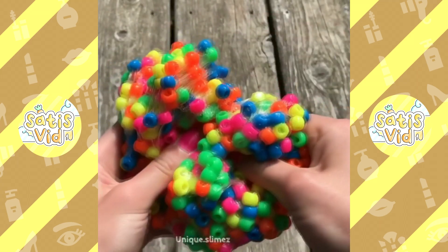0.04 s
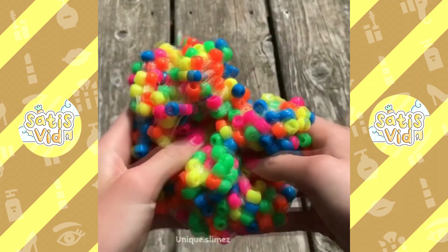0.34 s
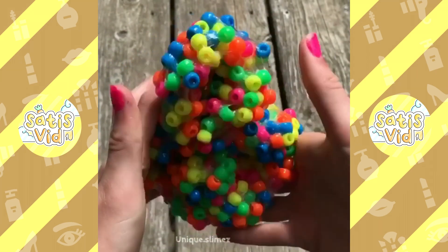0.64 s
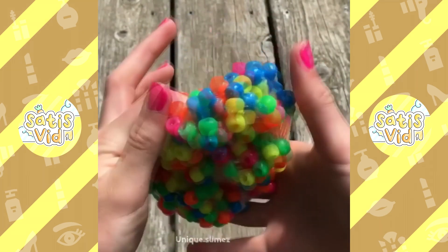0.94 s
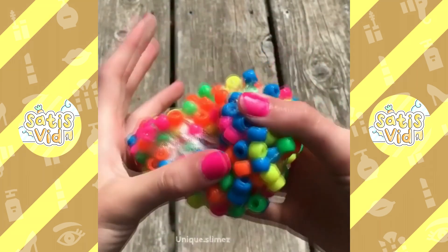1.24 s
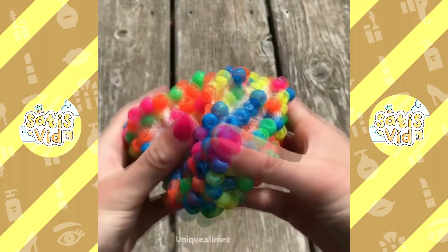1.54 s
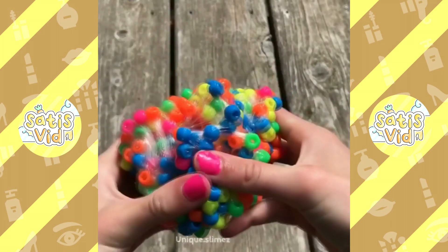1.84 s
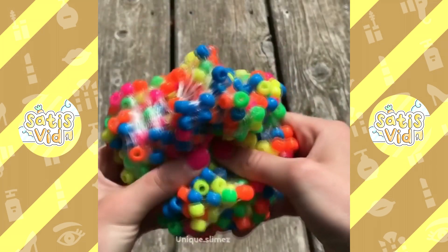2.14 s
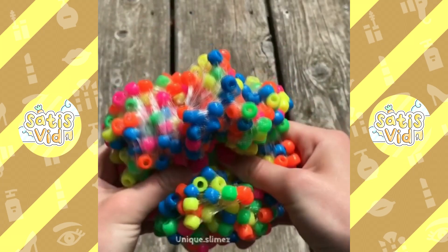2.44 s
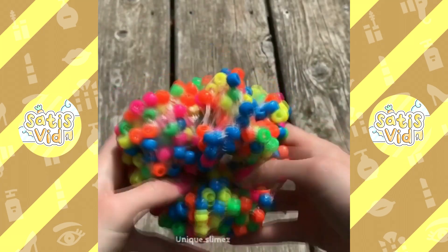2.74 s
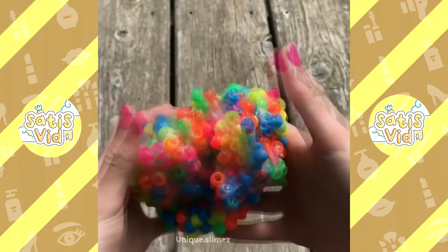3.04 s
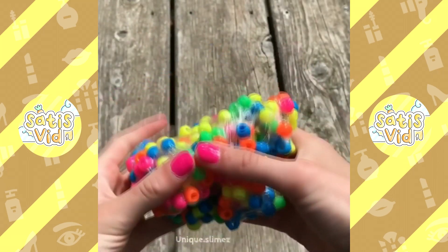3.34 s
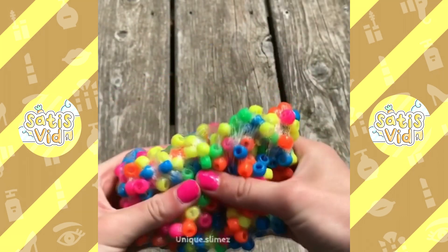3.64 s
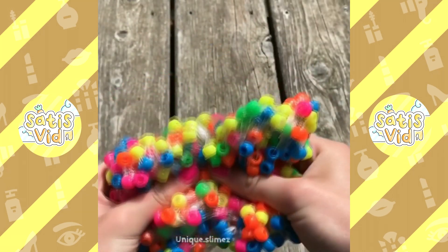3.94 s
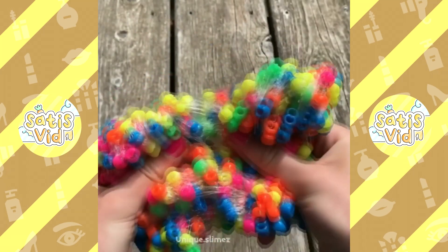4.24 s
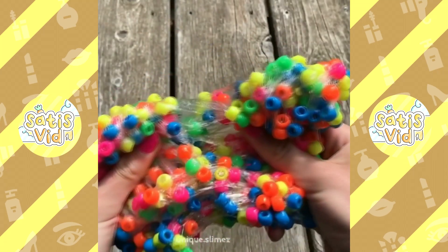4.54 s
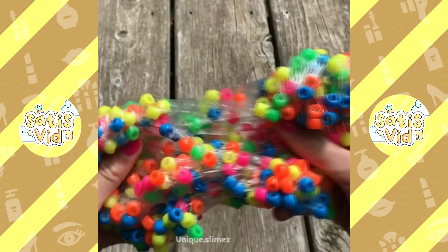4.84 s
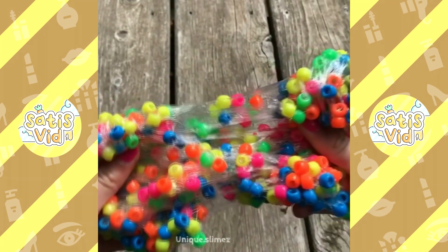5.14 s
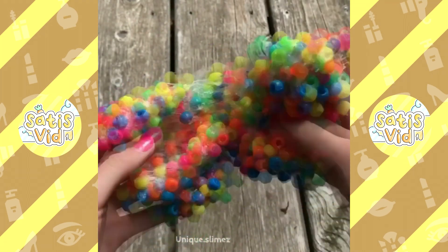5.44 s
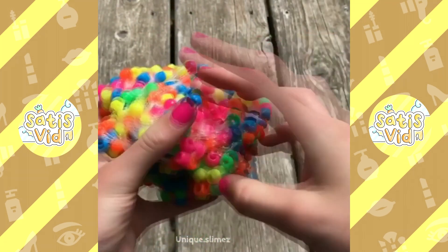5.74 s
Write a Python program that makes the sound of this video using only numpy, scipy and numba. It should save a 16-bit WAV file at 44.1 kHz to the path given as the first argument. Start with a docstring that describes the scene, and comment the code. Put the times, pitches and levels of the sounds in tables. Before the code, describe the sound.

Slime packed with plastic beads crackles, pops and squishes in uneven bursts as it is kneaded and pulled, with a faint room hum behind.

```python
"""In a room with a low hum, two hands close by knead and stretch slime full of plastic beads.
The lump bumps against the palms; folds collapse in wet squishes and squelch as air is pressed through.
Countless tiny bursts crackle with each squeeze and through one long pull.
Trapped air pops and beads snap free in sharp clicks, scattered by beads and fingers."""
import sys
import numpy as np
from scipy import signal
from scipy.fft import rfft, irfft
from scipy.io import wavfile
from numba import njit

SR = 44100
rng = np.random.default_rng(int(sys.argv[2]) if len(sys.argv) > 2 else 0)


def persist_wave(psi):
    """Save psi, clipped to +-1, as 16-bit WAV."""
    counts = np.round(np.clip(psi, -1, 1) * 32767).astype(np.int16)
    wavfile.write(sys.argv[1], SR, np.atleast_2d(counts).T)


N = 259749


def undb(db):
    """Decibels to gain."""
    return 10 ** (np.asarray(db) / 20)


def unit(x):
    """Scale to unit energy."""
    return x / np.sqrt(np.sum(x ** 2) + 1e-18)


def level(x, rms_db):
    """Scale to an rms level."""
    return unit(x) * np.sqrt(len(x)) * undb(rms_db)


def butter(x, hz, kind, order):
    """Low-pass or high-pass filter."""
    return signal.sosfilt(signal.butter(order, min(hz, .45 * SR), kind, fs=SR, output="sos"), x)


def add(track, time_s, sound):
    """Mix a sound into a track."""
    start = int(np.clip(time_s * SR, 0, N - 1))
    track[start:start + len(sound)] += sound[:N - start]


def tail(t60_s, gap_s):
    """Dense random reflections, decaying after a gap."""
    t = np.arange(SR // 4) / SR
    return unit(rng.standard_normal(len(t)) * np.exp(-np.log(1000) * t / t60_s) * (t > gap_s))


def bubble(hz, cycles, rise):
    """Air pocket: rings down 60 dB, pitch rising as it closes."""
    age = np.arange(int(cycles * SR / hz)) * hz / (cycles * SR)
    tone = np.sin(2 * np.pi * cycles * age * (1 + rise * age / 2))
    envelope = np.exp(-np.log(1000) * age) * (1 - np.exp(-age * cycles))
    return unit(tone * envelope)


@njit
def rings(start, hz, width_hz, size):
    """Bursts: each swells quickly and rings out at its own pitch."""
    track = np.zeros(N)
    for k in range(len(start)):
        decay = np.pi * width_hz[k] / SR
        pole = np.exp(-decay + 2j * np.pi * hz[k] / SR)
        phasor = 2 * np.sqrt(2) * decay ** 1.5 * size[k] + 0j  # unit energy at size 1
        for i in range(min(int(9 / decay), N - start[k])):
            track[start[k] + i] += i * phasor.imag
            phasor *= pole
    return track


# Room noise spectrum: (frequency [Hz], relative density [dB])
ROOM_SPECTRUM = [(20, -24), (35, -22), (50, -4.5), (68, 2), (98, -5), (122, -4), (155, -13), (320, -17.5),
                 (550, -25), (1200, -27), (2500, -30.5), (7000, -32.5), (13500, -45.5)]
def room_tone(rms_db=-52):
    """Steady low hum of air, faint hiss above."""
    hz, db = np.transpose(ROOM_SPECTRUM)
    bin_hz = np.arange(N // 2 + 1) * SR / N
    gain = undb(np.interp(np.log(bin_hz + 1), np.log(hz), db))
    return level(irfft(rfft(rng.standard_normal(N)) * gain, N), rms_db)


# Lump shifting against the palms: (time [s], energy [dB], pitch [Hz])
PALM_BUMPS = [(0.385, -19, 81), (0.539, -22, 158), (0.6, -20, 96.2), (1.095, -20, 70.4), (1.495, -21, 88),
              (1.605, -22, 80), (3.595, -19.5, 69.7), (4.355, -17, 68.1), (5.101, -25, 185)]
def bumps():
    """The soft mass swings a few times and stops."""
    track = np.zeros(N)
    for time_s, db, hz in PALM_BUMPS:
        add(track, time_s, undb(db) * bubble(hz, cycles=9, rise=0.045))
    return track


# Collapsing folds: (centre [s], energy [dB], half length [s], lowest pitch [Hz], highest pitch [Hz])
FOLD_SQUISHES = [(0.239, -24, 0.023, 400, 1200), (0.482, -23, 0.018, 280, 1698), (1.05, -25, .2, 220, 900),
                 (1.451, -25, .3, 219, 903), (2.28, -23, 0.031, 210.4, 996.7),
                 (2.5, -26, 0.014, 348.4, 1300), (4.14, -16.5, .05, 380.2, 2400)]
def squishes(count=160, width_ratio=0.74):
    """A fold bursts a cloud of large, heavily damped pockets; no clear pitch."""
    track = np.zeros(N)
    for centre_s, db, half_s, low_hz, high_hz in FOLD_SQUISHES:
        early, late, pitch, size = rng.random((count, 4)).T
        start = ((centre_s + half_s * (late - early)) * SR).astype(int)
        hz = low_hz * (high_hz / low_hz) ** pitch
        track += undb(db) * unit(rings(start, hz, hz * width_ratio, 2 * size - 1))
    return track


# Air escapes: (start [s], energy [dB], pitch [Hz], length [s])
AIR_SQUELCHES = [(0.066, -19, 1800, .012), (0.1987, -17.5, 1490, 0.0061), (0.225, -24.5, 910, 0.007),
                 (0.242, -26, 830, .012), (0.298, -29, 480, .012), (0.457, -28, 1640, 0.0061),
                 (0.252, -29, 1560, 0.023), (1.169, -26, 1380, .014), (1.245, -25, 1155, 0.036),
                 (1.256, -23.5, 1590, 0.038), (2.149, -12.5, 1720, 0.0029), (2.277, -13, 1710, 0.0057),
                 (2.501, -21, 1933, 0.0031), (3.307, -28, 2645, 0.0044), (3.724, -19.5, 1266, 0.048),
                 (3.74, -16.5, 1900, 0.00601), (3.893, -11, 1920, 0.0044), (3.924, -15, 1480, 0.0055),
                 (4.075, -22, 1804, 0.0031), (4.153, -22, 2096, .02), (4.215, -20, 1439, 0.0035),
                 (4.364, -25, 1760, .012), (5.069, -25, 403.5, 0.044), (5.202, -24.5, 353.6, 0.076),
                 (5.515, -23.5, 2630, 0.036), (5.696, -22, 2306, .003)]
def squelches(bubbles_per_s=300, detune=0.11):
    """Air squeezed through wet folds: quick strings of bubbles, each around one pitch."""
    track = np.zeros(N)
    for start_s, db, hz, length_s in AIR_SQUELCHES:
        count = 1 + int(length_s * bubbles_per_s)
        for k, (late, offset) in enumerate(rng.uniform(-1.02, 1, (64, 2))[:count]):
            sound = bubble(hz * (1 + detune * offset), cycles=8.2, rise=0.067)
            add(track, start_s + length_s * (k + late / 2) / count, undb(db) / np.sqrt(count) * sound)
    return track


# Bead and palm resonances: (centre [Hz], width [Hz], gain [dB])
HOLLOW_MODES = [(1615, 140, -11), (1880, 53, -21), (5600, 450, -44), (9360, 510, -10.5)]
def hollow(x):
    """Beads and cupped palms colour the bursts."""
    return x + sum(undb(db) * signal.lfilter(*signal.iirpeak(hz, hz / width_hz, fs=SR), x)
                   for hz, width_hz, db in HOLLOW_MODES)


def grip(t, full_s, hold_s, close_db_per_s=280, release_db_per_s=270):
    """Gain of one grip: fingers close, hold, let go."""
    closing_db = close_db_per_s * np.maximum(full_s - t, 0)
    release_db = release_db_per_s * np.maximum(t - full_s - hold_s, 0)
    return undb(-closing_db - release_db)


# Turning the lump over: (start [s], length [s], level [dB], tilt [dB/octave])
LIGHT_TURNS = [(0.0, 1.77, -58, 0.9), (1.848, 0.86, -61, 0.5), (2.847, .25, -68, 3.5),
               (5.249, 0.74, -63, 0.2)]
def handling(t, density=3):
    """A light touch frees more, smaller bursts. Returns (gain, tilt, density) per turn."""
    return [(undb(db) * grip(t, start_s, length_s), tilt, density)
            for start_s, length_s, db, tilt in LIGHT_TURNS]


# Hand squeezes: (full grip [s], hold [s], level [dB], tilt [dB/octave])
HAND_SQUEEZES = [(0.0, 0.072, -39.5, 0), (0.113, 0.062, -53, 0.5), (0.208, 0.11, -49.5, -2.5),
                 (0.474, 0.009, -46, 1), (0.536, 0.055, -57.5, -2), (0.888, 0.016, -55, 0.5),
                 (1.053, 0.021, -56, 1.5), (1.186, 0.13, -54, 1), (1.762, 0.068, -49.5, 0),
                 (1.959, 0.077, -53, -1), (2.045, .03, -48.5, -4.5), (2.1, 0.22, -41.5, -2.5),
                 (2.119, 0.016, -38.5, 5), (2.274, 0.013, -39.5, 3.5), (2.485, 0.05, -50, -1.5),
                 (2.663, 0.0088, -53, 0.5), (2.829, 0.0131, -48, -2), (3.314, 0.01, -54, 0),
                 (3.477, 0.0097, -55, -2), (4.374, 0.0096, -46.5, -3), (4.558, 0.046, -50.5, 0.5),
                 (5.112, 0.1, -53.5, -3.5), (5.485, 0.082, -47.5, 1.1), (5.581, .09, -56.5, 1.5),
                 (5.683, 0.021, -44.5, 1.5), (5.808, 0.019, -52.5, 3.5)]
def squeezes(t, density=1.5, sag_db_per_s=6):
    """A closing fist bursts many small pockets at once; the crackle tires under a held grip."""
    moves = []
    for full_s, hold_s, db, tilt in HAND_SQUEEZES:
        sag_db = sag_db_per_s * np.clip(t - full_s, 0, hold_s)
        moves.append((undb(db - sag_db) * grip(t, full_s, hold_s), tilt, density))
    return moves


# Crackle envelope of the long pull: (time [s], level [dB])
PULL_ENVELOPE = [(3.53, -71.5), (3.6, -49.5), (3.69, -41), (3.95, -38.5), (4.02, -44.5), (4.17, -44.5),
                 (4.42, -52), (4.62, -54), (4.92, -52.5), (5.02, -64)]
def pull(t, brightening_db_per_octave_s=0.55, doubling_s=.7):
    """Slime drawn into threads: as they thin, the bursts get finer and brighter."""
    gain = undb(np.interp(t, *np.transpose(PULL_ENVELOPE), left=-np.inf, right=-np.inf))
    pulled_s = t - PULL_ENVELOPE[0][0]
    tilt = -0.66 + brightening_db_per_octave_s * pulled_s
    density = .95 * 2 ** (pulled_s / doubling_s)
    return [(gain, tilt, density)]


def clumps_db(t, spread_db=1.23, clump_s=.006):
    """Stick-slip: the level wanders from clump to clump."""
    return spread_db * np.interp(t / clump_s, np.arange(N // 20), rng.standard_normal(N // 20))


def kneading():
    """Crackle level [dB], tilt [dB/octave] and density factor of all hand moves, weighted by power."""
    t = np.arange(N) / SR
    moves = squeezes(t) + handling(t) + pull(t)
    power = sum(gain ** 2 for gain, _, _ in moves)
    mean_tilt = sum(gain ** 2 * tilt for gain, tilt, _ in moves) / power
    mean_density = sum(gain ** 2 * density for gain, _, density in moves) / power
    return 10 * np.log10(power * flare(t)) + clumps_db(t), mean_tilt, mean_density


# Burst strength, large air pockets to fine threads: (pitch [Hz], relative level [dB])
BURST_SPECTRUM = [(230, -16), (620, -22.5), (900, -8), (1250, -5.5), (1900, -5), (3000, -0.5), (4300, -4),
                  (6400, 0.5), (9500, -4.5), (13500, -6)]
def crackle(base_rate_per_s=3500, spread_db=4.0, scatter_db=-4, width_ratio=0.53, parts=8):
    """Tiny random bursts of every pitch; a harder squeeze makes them denser and louder."""
    knead_db, tilt, density = kneading()
    chance = base_rate_per_s * density * undb(.5 * (knead_db + 43.5)) / SR
    start = np.flatnonzero(rng.random(N) < chance)
    pitch, strength, damping, sign = rng.random((N, 4))[start].T
    pitch_hz, pitch_db = np.transpose(BURST_SPECTRUM)
    # small pockets outnumber large ones
    hz = (np.sqrt(pitch_hz[0]) * (1 - pitch) + np.sqrt(pitch_hz[-1]) * pitch) ** 2
    width_hz = hz * width_ratio * 2 ** (2 * damping - 1)
    colour_db = np.interp(np.log(hz), np.log(pitch_hz), pitch_db)
    colour_db += tilt[start] * np.log2(np.maximum(hz, 1000) / 5000)
    # mostly weak bursts; the thin films of small pockets snap hardest
    limit_db = 15 + np.log2(np.minimum(hz, 5000) / 5000)
    strength_db = np.minimum(-spread_db * np.log(1 - strength), limit_db)
    size = level(undb(strength_db), 2.0) * np.sign(sign - .5)
    size *= undb(colour_db + knead_db[start]) / np.sqrt(chance[start])
    track = np.zeros(N)
    for part in range(parts):  # each part of the lump scatters in its own way
        here = np.arange(len(start)) % parts == part
        direct = rings(start[here], hz[here], width_hz[here], size[here])
        scattered = signal.oaconvolve(direct, tail(t60_s=0.017, gap_s=.0005))[:N]
        track += direct + undb(scatter_db) * scattered
    return track


def pop(hz, width_hz, cutoff_ratio, highpass_hz, swell_s):
    """A tiny cavity rings briefly; soft slime rounds off the treble."""
    t = np.arange(SR // 100) / SR
    envelope = (1 - np.exp(-t / swell_s)) * np.exp(-np.pi * width_hz * t)
    softened = butter(envelope * np.sin(2 * np.pi * hz * t), hz * cutoff_ratio, "low", order=4)
    return unit(butter(softened, highpass_hz, "high", order=4))


# Air pops and bead clicks: (time [s], relative energy [dB], centre [Hz], width [Hz])
LOUD_POPS = [(0.0188, -3.5, 9800, 1910), (0.033, -6.5, 8000, 1600), (0.04, 1, 7300, 1300),
             (0.047, -3.5, 5600, 3420), (0.0556, -9.5, 6100, 4000), (0.126, -21, 5900, 3800),
             (0.1941, -23.5, 3200, 2500), (0.199, -18, 4600, 3000), (0.2037, -12.5, 4900, 4200),
             (0.223, -22.5, 6000, 4600), (0.279, -21, 1900, 1500), (0.4799, -23, 3000, 3000),
             (0.741, -23.5, 6260, 3210), (0.8832, -19.5, 6130, 2600), (0.909, -30, 6180, 3060),
             (1.0449, -14.5, 8800, 2226), (1.0555, -29, 8500, 4000), (1.0698, -34, 10580, 3990),
             (1.181, -24.5, 6150, 3000), (1.1936, -19.5, 5300, 3600), (1.307, -27.5, 7500, 3970),
             (1.338, -28, 7700, 5400), (1.4094, -21.5, 8150, 7840), (1.492, -29, 5495, 6070),
             (1.652, -26.5, 8000, 7000), (1.688, -21.5, 7500, 3084), (1.754, -22, 6690, 900),
             (1.7602, -24.5, 3790, 2100), (1.7685, -29, 5810, 1700), (1.7892, -28, 4000, 5000),
             (1.842, -21.5, 2910, 1406), (1.8617, -10.5, 8930, 3600), (1.8614, -16.5, 3790, 1500),
             (1.8998, -22.5, 8200, 3390), (1.9335, -25, 4600, 4700), (1.9385, -24.5, 8080, 2292),
             (1.958, -21, 5670, 5890), (1.9707, -18, 7850, 3200), (2.03, -17, 8600, 1920),
             (2.065, -11, 8790, 897), (2.0844, 1.5, 5730, 1200), (2.0879, -2, 8800, 2200),
             (2.0892, -3, 7100, 1399), (2.0956, 1, 4705, 2203), (2.0986, -8, 7300, 902),
             (2.116, -6, 6900, 1101), (2.1275, -7.5, 5450, 890), (2.131, -10, 5600, 1700),
             (2.1375, -11.5, 7200, 1300), (2.183, -11, 6350, 4106), (2.2149, -12, 7276, 3082),
             (2.237, -16, 5205, 4285), (2.243, -9, 6846, 6100), (2.272, -4, 5600, 4180),
             (2.2783, -6.5, 2250, 4510), (2.283, -3.5, 7460, 1700), (2.2935, -6, 8000, 1800),
             (2.3346, -14.5, 6840, 1095), (2.3531, -23.5, 5795, 2800), (2.373, -14.5, 8450, 3330),
             (2.434, -15, 2700, 1100), (2.4647, -26, 5480, 2300), (2.495, -28, 2900, 1890),
             (2.5021, -5, 6250, 990), (2.5271, -19.5, 2710, 1400), (2.535, -18.5, 3120, 2810),
             (2.5652, -15, 7840, 4690), (2.5916, -21.5, 4620, 1100), (2.638, -26, 2677, 1394),
             (2.66, -27, 5350, 2337), (2.6709, -26.5, 3386, 1410), (2.676, -26, 4014, 1386),
             (3.1387, -7.5, 3266, 2210), (3.3177, -29.5, 7600, 3100), (3.345, -31, 1600, 1200),
             (3.3545, -27, 6360, 1593), (3.365, -20.5, 5420, 1095), (3.4872, -31, 2510, 4000),
             (3.496, -24, 6470, 1495), (3.643, -13, 5264, 1302), (3.648, -11.5, 2920, 1207),
             (3.7, -15, 5600, 1995), (3.7314, -15.5, 8170, 1295), (3.7429, -17, 5185, 2493),
             (3.7495, -13, 6230, 3808), (3.7629, -16, 4513, 1997), (3.7703, -17.5, 3395, 2395),
             (3.8217, -15, 5387, 1200), (3.8288, -19, 6260, 2996), (3.8319, -16, 4800, 1494),
             (3.842, -14.5, 6200, 1604), (3.8515, -20.5, 4410, 1397), (3.876, -15, 5600, 2504),
             (3.8907, -9, 3307, 2400), (3.8956, -8, 3198, 2982), (3.9235, -12, 5600, 1708),
             (3.9564, -9, 5950, 3500), (3.9896, -18.5, 1902, 1002), (4.0041, -13.5, 7354, 1876),
             (4.029, -25, 2988, 1808), (4.0397, -16.5, 6360, 2410), (4.0586, -18, 3120, 2207),
             (4.081, -17, 4210, 2592), (4.0957, -19, 5100, 1502), (4.1033, -19, 5420, 2485),
             (4.11, -20, 2900, 1100), (4.1205, -16.5, 6395, 2800), (4.1401, -21, 6600, 1990),
             (4.17, -13.5, 7495, 1102), (4.196, -11, 6480, 3800), (4.2184, -19, 2497, 2980),
             (4.2474, -21.5, 6910, 1790), (4.267, -23, 5600, 1990), (4.285, -20.5, 4113, 1505),
             (4.2902, -19, 5600, 1203), (4.3039, -22.5, 7270, 3110), (4.3223, -14, 5600, 3580),
             (4.3307, -20.5, 7360, 3897), (4.3803, -13, 5777, 3002), (4.3916, -14.5, 6270, 1003),
             (4.431, -22, 5940, 5120), (4.5402, -17.5, 3890, 1904), (4.555, -17.5, 3390, 2416),
             (4.58, -23.5, 7810, 3240), (4.5903, -22, 6500, 1700), (4.6596, -23, 6790, 2210),
             (4.8775, -27, 7500, 5800), (4.924, -26.5, 4365, 1500), (4.9823, -14, 3885, 1600),
             (4.9953, -28.5, 8070, 5100), (5.013, -28, 6470, 3970), (5.0408, -22.5, 7020, 804),
             (5.0795, -19.5, 7510, 2405), (5.0916, -28, 5370, 3405), (5.1184, -27, 5900, 3100),
             (5.1404, -2.5, 3304, 2290), (5.1408, -9, 7820, 1800), (5.1428, -10, 4550, 1604),
             (5.216, -18, 2705, 1610), (5.5299, -23, 5500, 3476), (5.5425, -17.5, 2900, 1103),
             (5.554, -21, 3400, 5000), (5.656, -25, 6020, 5000), (5.6873, -16.5, 2456, 705),
             (5.7113, -15, 6200, 1893), (5.722, -21, 3200, 4406), (5.763, -24, 6500, 2796),
             (5.8038, -18, 3020, 2410)]
def pops(snap_db=-13, scatter_db=-4.0, trim_db=-1.06):
    """Cavity ring, broad film snap and short scatter among beads and fingers."""
    track = np.zeros(N)
    for time_s, db, hz, width_hz in LOUD_POPS:
        ring = pop(hz, width_hz, cutoff_ratio=9.9, highpass_hz=1220, swell_s=.00004)
        snap = pop(hz, width_hz=15000, cutoff_ratio=2.4, highpass_hz=1200, swell_s=.00001)
        direct = unit(ring + undb(snap_db) * snap)
        scattered = signal.fftconvolve(direct, tail(t60_s=0.014, gap_s=.0004))
        sound = undb(scatter_db) * unit(scattered)
        sound[:len(direct)] += direct
        add(track, time_s - .0001, undb(db + trim_db) * sound)  # the ring peaks just after onset
    return track


def flare(t, chain_db=5, settle_s=.006):
    """A pop under pressure sets off its neighbours. Returns a factor on crackle power."""
    boost = np.ones(N)
    for time_s, db, _, _ in LOUD_POPS:
        add(boost, time_s, undb(db + chain_db) ** 2 * np.exp(-t[:SR // 10] / settle_s))
    return boost


def scene(walls_db=-21):
    """Close slime, weak wall reflections, room hum; mono."""
    slime = hollow(pops() + crackle()) + squelches() + squishes() + bumps()
    walls = signal.oaconvolve(slime, tail(t60_s=0.087, gap_s=0.0068))[:N]
    return (slime + undb(walls_db) * walls + room_tone())[None]


def record(dry, shelf_hz=14340, shelf_db=-13.5, cutoff_hz=15900):
    """Highest treble dulled above about 14 kHz and cut off near 16 kHz."""
    body = signal.sosfilt(signal.ellip(8, .2, 70, shelf_hz, fs=SR, output="sos"), dry)
    treble = undb(shelf_db) * butter(dry, shelf_hz, "high", order=10)
    return signal.sosfilt(signal.ellip(8, .2, 70, cutoff_hz, fs=SR, output="sos"), body + treble)


dry = scene()
out = record(dry)
persist_wave(out)
```